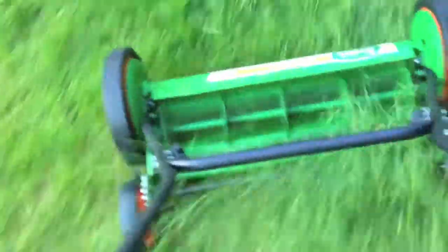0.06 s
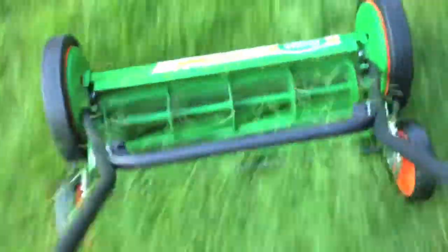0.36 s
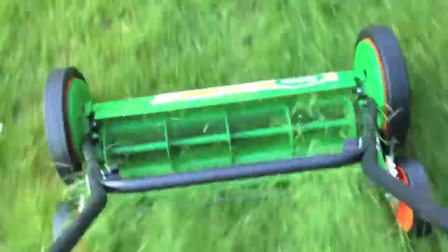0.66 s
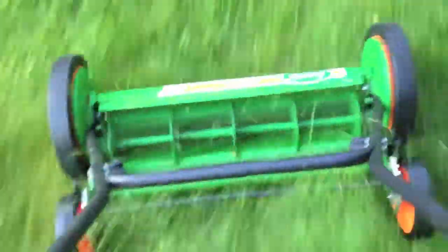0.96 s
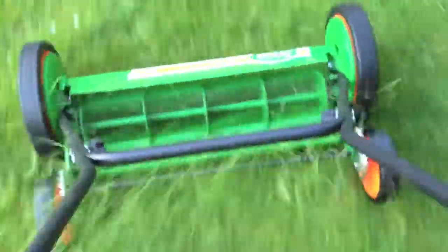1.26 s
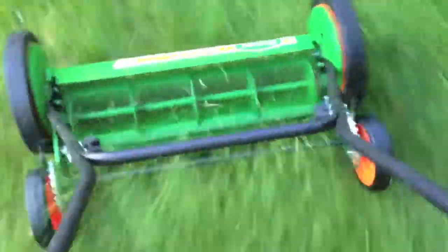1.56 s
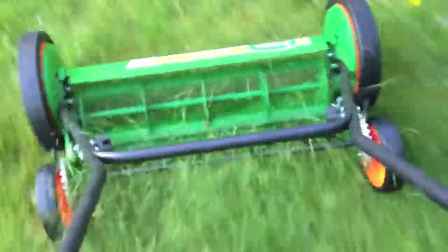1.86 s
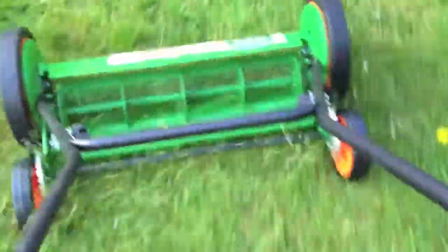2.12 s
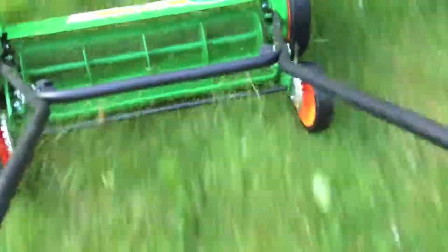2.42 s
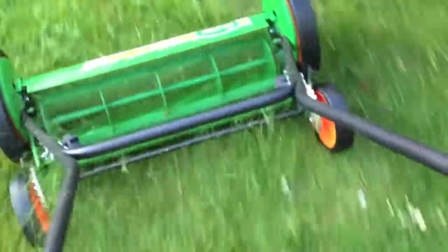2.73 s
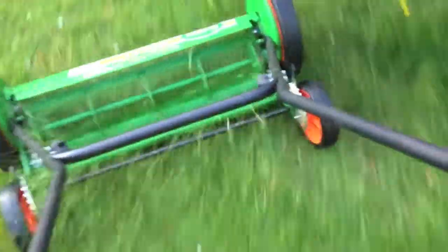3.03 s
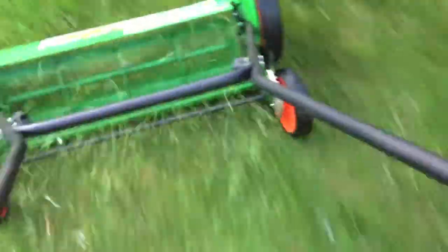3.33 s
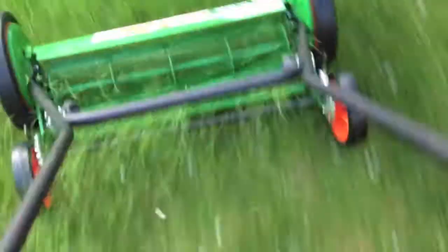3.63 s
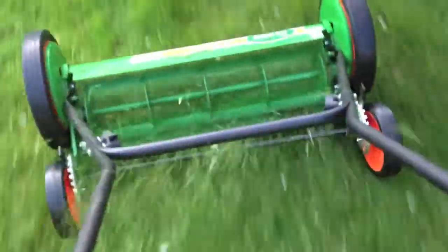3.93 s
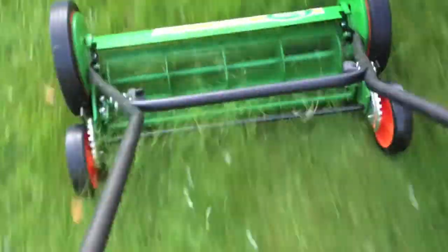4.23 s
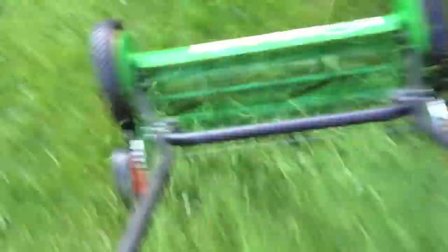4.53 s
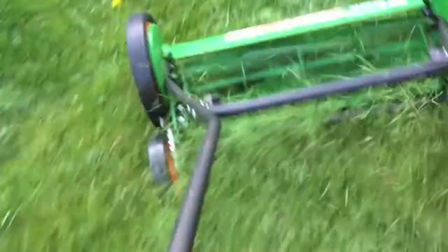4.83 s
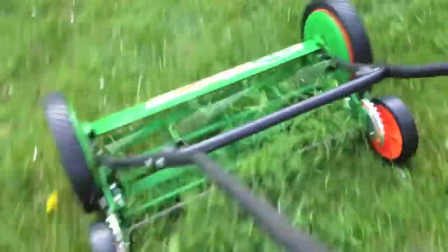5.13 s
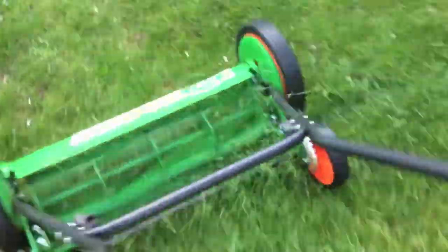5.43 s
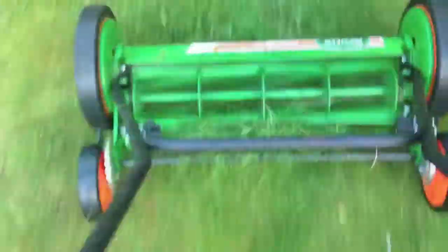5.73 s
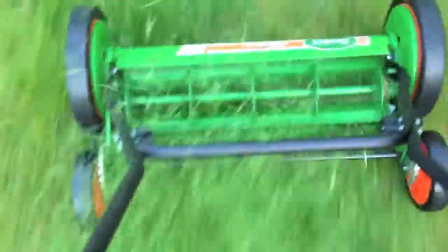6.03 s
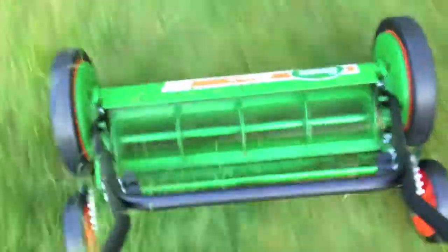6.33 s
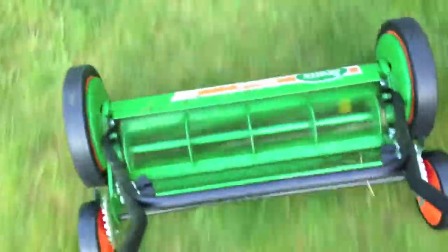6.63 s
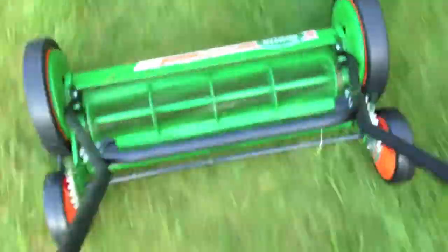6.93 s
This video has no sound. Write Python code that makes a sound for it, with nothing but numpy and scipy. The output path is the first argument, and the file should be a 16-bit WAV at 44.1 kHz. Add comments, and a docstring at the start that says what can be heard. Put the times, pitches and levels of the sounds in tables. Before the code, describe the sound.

A hand-pushed reel mower runs across a lawn, heard close from the handle with almost no outdoor background. From the start its blades make a fast, rhythmic steel-on-steel whir with faint wavering ringing and a crisp hiss of cut grass. Gears rattle in the hollow wheels, the tyres drum on the turf and the handle knocks now and then. Brighter swishes come between 1 and 2.6 seconds, with a sharp jolt at about 1.4 and two small stalk snaps just after. Blades clack around 2.4 and 3 seconds, and the wheels thump dully near 2.5 and 3.6. After a double jolt at 4.8 seconds, the mower slows to a much softer flutter for a turn. From 5.5 seconds it gathers speed again, quieter than before, with spurts of grass hiss and a few bumps until about 7 seconds.

```python
"""A whirring, rhythmic scrape of steel: a hand-pushed reel mower crossing a lawn, heard from its handle.
Five spiral blades wipe the bed knife about 44 times a second; friction rings the steel and sheared grass
hisses. Gear teeth rattle in the hollow wheels, the tyres drum on the turf and bumps knock the frame.
Near 5 s the mower slows for a turn, then gathers speed again."""
import sys
import numpy as np
from scipy import signal
from scipy.fft import rfft, irfft, next_fast_len
from scipy.io import wavfile
from scipy.ndimage import uniform_filter1d, map_coordinates

SR = 44100
rng = np.random.default_rng(int(sys.argv[2]) if len(sys.argv) > 2 else 0)


def master_out(mix):
    """Clip the mix to full scale and print it as 16-bit PCM to the path in sys.argv[1]."""
    frames = np.transpose(np.atleast_2d(mix))
    ceiling = np.clip(frames, -1, 1)
    pcm = np.round(ceiling * 32767).astype(np.int16)
    wavfile.write(sys.argv[1], SR, pcm)


N = 307377
CRUISE_HZ = 44  # blade passes a second at a steady walk

# resonances of wheels, frame and blades: (frequency [Hz], width [Hz], height above the spectrum [dB])
WHEEL_RESONANCES = [(774, 109, 8.5), (841, 49, 3.5), (952, 61, 5), (1060, 92, 6), (1250, 43, 5.5)]
FRAME_RESONANCES = [(1491, 24, 7.2), (1625, 30, 6.2), (1820, 53, 4), (1918, 180, 5)]
BLADE_RESONANCES = [(2587, 91, 3.7), (2840, 103, 1.5), (3020, 56, 0.7), (3625, 110, 2.8), (3883, 210, 2.7),
                    (4276, 180, 4.1), (4470, 65, 3.5), (4858, 110, 2.8), (4740, 76, 3), (5063, 176, 3.8),
                    (6760, 160, 4.1), (7150, 170, 1.15), (8140, 240, 3.9), (8974, 374, 3.7)]
# broad spectra of frame and blades: (frequency [Hz], relative level [dB])
FRAME_SPECTRUM = [(700, -33), (1200, -24), (1450, 2), (1900, 1), (2050, -2), (2600, -3.5), (7000, -41.5)]
BLADE_SPECTRUM = [(500, -36), (1800, -10.5), (2650, -1), (3200, -0.5), (5000, -1.5), (5500, -2.5),
                  (7500, -4), (8500, -10.5), (10000, -15.5), (15000, -17.5)]


def amp(db):
    """Amplitude ratio of a level in decibels."""
    return 10 ** (np.asarray(db) / 20)


def unit(x):
    """Normalisation to an rms of 1."""
    return x / np.sqrt(np.mean(x ** 2) + 1e-20)


def curve(rows):
    """Linear interpolation of (time [s], value) rows at every sample."""
    return np.interp(np.arange(N) / SR, *np.transpose(rows))


def swell(start, end):
    """Half-sine envelope: one rise and fall between two times."""
    return np.sin(np.pi * np.clip((np.arange(N) / SR - start) / (end - start), 0, 1))


def wobble(rate, size=8192):
    """Slow random modulation: a spline through rate Gaussian knots a second."""
    knots = N * rate / SR
    coarse = map_coordinates(rng.standard_normal(int(knots) + 4), [np.linspace(0, knots, size)])
    return np.interp(np.arange(N), np.linspace(0, N, size), coarse)


def grains(rate, spread_db):
    """Shot noise: tiny random contacts, rate a second, of log-normal size."""
    present = rng.random(N) < rate / SR
    return unit(present * np.sign(rng.standard_normal(N)) * amp(spread_db * rng.standard_normal(N)))


def burst(attack, t60):
    """Impact excitation: noise that rises quickly, under a decay of 60 dB in t60 seconds."""
    t = np.arange(SR // 3) / SR
    return rng.standard_normal(len(t)) * (1 - np.exp(-t / attack)) * amp(-60 * t / t60)


def band(x, centre_hz, q):
    """A second-order resonator of quality factor q."""
    return signal.lfilter(*signal.iirpeak(min(centre_hz, SR / 2 - 1), q, SR), x)


def body(x, spectrum, modes=(), size=16384):
    """Forced response of a body: a minimum-phase filter with resonance peaks on a broad spectrum."""
    hz = np.fft.rfftfreq(size, 1 / SR)
    knot_hz, knot_db = np.transpose(spectrum)
    db = np.interp(np.log(hz + 1), np.log(knot_hz), knot_db)
    for centre, width, height in modes:
        db = db + height / (1 + (2 * (hz - centre) / width) ** 2)
    cepstrum = irfft(np.log(amp(db)))
    cepstrum[1:size // 2] *= 2  # folding the cepstrum makes the response causal
    cepstrum[size // 2 + 1:] = 0
    return signal.fftconvolve(x, irfft(np.exp(rfft(cepstrum))))[:len(x)]


def patches(x, depth_db, size=1024):
    """Spectral fluctuation: no two contacts are alike, so narrow bands swell and fade at random."""
    spectra = signal.stft(x, nperseg=size)[2]
    field = rng.standard_normal(spectra.shape)
    field = uniform_filter1d(uniform_filter1d(field, 3, axis=0), 3, axis=1)
    return unit(signal.istft(spectra * amp(depth_db * unit(field)), nperseg=size)[1][:N])


def add(track, time, sound, peak_db):
    """Superposition: a sound joins the track at the given time and peak level."""
    part = track[max(round(time * SR), 0):][:len(sound)]
    part += (amp(peak_db) * sound / np.abs(sound).max())[:len(part)]


def pressure(passes, peak_at, depth_db, scatter_db, sharp=0):
    """Amplitude modulation: the sliding contact drives a part hardest near fraction peak_at of a pass."""
    # how hard each of the five blades meets the knife: (relative level [dB])
    contact_db = [0.37, -0.85, 0.82, 0.23, -0.36]
    cycles = passes - peak_at + 1.5
    count = cycles.astype(int)
    angle = 2 * np.pi * cycles
    bite = -np.cos(angle + sharp * (1 - np.cos(angle)))  # a sharp bite rises fast and eases off slowly
    pass_db = np.take(contact_db, count, mode="wrap") + scatter_db * rng.standard_normal(1024)[count]
    return unit(amp(depth_db * bite + pass_db * (1 + bite) / 2))


def clump_boost(cut_s=0.072):
    """Transient loading: the rise in level [dB] while coarse stalks pass through the blades."""
    # clumps of stalks: (time [s], rise of the grass hiss [dB])
    clumps = [(1.38, 2.5), (1.645, 4), (2.385, 4), (2.5, 5), (4.11, 2), (5.259, 1), (5.9, 3.5), (6.0, 5),
              (6.31, 5), (6.48, 4.5), (6.64, 2.5), (6.85, 4.5)]
    return sum(db * swell(time - cut_s / 2, time + cut_s / 2) for time, db in clumps)


def air():
    """Ambient noise: a faint, steady broadband floor."""
    # outdoor air: (frequency [Hz], relative level [dB])
    air_spectrum = [(25, -30), (200, 2), (1000, 1), (15000, -17)]
    return amp(-66) * unit(body(rng.standard_normal(N), air_spectrum))


def rolling(load_db):
    """Roughness excitation: hard tyres drum over the turf, louder under load, and thump into hollows."""
    # broad spectra of tyres and turf: (frequency [Hz], relative level [dB])
    tyre_spectrum = [(25, -66), (60, -54), (110, -17), (160, -4), (200, -1), (330, -1), (430, -2.5),
                     (650, 1.5), (900, -19), (2000, -34)]
    turf_spectrum = [(25, -33), (50, -37), (80, -17.5), (135, -0.5), (230, -3), (330, -13.5), (600, -33),
                     (1500, -56)]
    # resonances of the tyres and of the mower bouncing on them: (frequency [Hz], width [Hz], height [dB])
    tyre_modes = [(207.6, 23.5, 10.1), (281.6, 25, 6.8), (364, 32, 5.2), (492, 14.4, 8.3), (565, 105, 6.6)]
    bounce_modes = [(147, 70, 5)]
    # stretches of uneven ground: (start [s], end [s], rumble level [dB])
    uneven_ground = [(0.0, 1.6, -59), (0.452, 0.95, -51), (2.3, 3.25, -50.5), (3.55, 3.66, -41),
                     (3.88, 4.76, -49), (5.08, 5.318, -52)]
    # wheels dropping into hollows: (time [s], peak level [dB])
    thumps = [(2.35, -26.5), (2.507, -28.5), (2.683, -26.5), (2.781, -32), (2.892, -32), (3.567, -23),
              (3.604, -24), (3.946, -30), (3.985, -31), (4.123, -32), (4.522, -34)]
    drum_db = -41 + 0.95 * load_db + 1.27 * wobble(14)
    rumble_gain = amp(-69.5) + sum(amp(db) * swell(start, end) for start, end, db in uneven_ground)
    tread = patches(body(grains(rate=1200, spread_db=3), tyre_spectrum, tyre_modes), depth_db=2.5)
    ground = unit(body(grains(rate=600, spread_db=3), turf_spectrum))
    out = amp(drum_db) * tread + rumble_gain * ground
    for time, db in thumps:
        add(out, time, body(burst(attack=0.0053, t60=0.07), turf_spectrum, bounce_modes), db)
    return out


def teeth(passes, per_pass, jitter, spread_db):
    """Gear backlash: one tap a tooth, its timing scattered by a fraction jitter of the tooth period."""
    onsets = np.flatnonzero(np.diff(np.floor(passes * per_pass)))
    lateness, strength = rng.standard_normal((len(onsets), 2)).T
    onsets = np.clip(onsets + jitter * np.gradient(onsets) * lateness, 0, N - 1).astype(int)
    return unit(np.bincount(onsets, amp(spread_db * strength), N))


def gears(passes, effort_db, load_db):
    """Structure-borne sound: tooth taps and sliding grit excite the hollow wheels and the steel frame."""
    # broad spectrum of the wheels: (frequency [Hz], relative level [dB])
    wheel_spectrum = [(300, -48.5), (660, -9.5), (740, -4), (1100, 0.5), (1350, -0.5), (1700, -10.5),
                      (3000, -34.5)]
    wheel_db = -29.5 + load_db
    frame_db = -28 + 0.42 * effort_db + 0.51 * load_db + 0.63 * wobble(16)
    taps = teeth(passes, per_pass=6, jitter=0.15, spread_db=1.5)
    on_wheels = taps + 2.27 * grains(rate=4000, spread_db=3)
    on_wheels *= pressure(passes, peak_at=0.12, depth_db=0.5, scatter_db=0.5)
    on_frame = taps + 1.88 * grains(rate=5000, spread_db=1)
    on_frame *= pressure(passes, peak_at=0.43, depth_db=2.5, scatter_db=0.5)
    wheels = patches(body(on_wheels, wheel_spectrum, WHEEL_RESONANCES), depth_db=1.5)
    frame = patches(body(on_frame, FRAME_SPECTRUM, FRAME_RESONANCES), depth_db=1)
    return amp(wheel_db) * wheels + amp(frame_db) * frame


def clatter():
    """Impact and fracture: each knock, jolt, clack or snap briefly excites the resonances of its source."""
    # the handle knocking in its mounts: (time [s], peak level [dB], frequency [Hz])
    knocks = [(0.043, -23, 536), (0.395, -25, 590), (1.458, -24, 567), (2.02, -23.5, 592.5),
              (2.225, -27.5, 541.4), (2.398, -25, 610), (3.403, -24, 571), (4.259, -25, 590.6),
              (4.524, -26, 566), (4.751, -24, 523.5), (5.069, -23, 639), (5.926, -27, 616.7)]
    # bumps jolting the whole frame: (time [s], peak level [dB])
    jolts = [(.043, -15), (1.362, -9.5), (1.688, -17), (2.684, -17), (4.751, -13), (4.785, -13),
             (6.027, -19), (6.466, -15), (6.842, -19)]
    # blades catching hard on the knife: (time [s], relative peak level [dB])
    clacks = [(1.362, -6), (1.405, -8), (1.525, -11), (2.399, -5), (2.465, -6), (2.492, -8), (2.95, -12),
              (3.038, -5), (3.081, -9.5), (3.533, -14)]
    # dry stalks snapping: (time [s], peak level [dB], frequency [Hz], 60 dB decay time [s])
    snaps = [(1.468, -13, 11080, 0.041), (1.679, -10.5, 10340, 0.0096)]
    out = np.zeros(N)
    for time, db, hz in knocks:
        add(out, time, band(band(burst(attack=0.00036, t60=0.041), hz, q=6.3), hz, q=3.3), db)
    # the frame's response to a jolt: (frequency [Hz], relative level [dB])
    jolt_spectrum = [(60, -42), (200, -11), (400, -8), (650, -10), (1000, -1), (1500, 1), (2100, 1),
                     (3000, -12), (8000, -26)]
    for time, db in jolts:
        blow = burst(attack=0.00075, t60=0.052)
        add(out, time, body(blow, jolt_spectrum, WHEEL_RESONANCES + FRAME_RESONANCES), db)
    for time, db in clacks:
        blow = burst(attack=0.00135, t60=0.03)
        blade_ring = body(blow, BLADE_SPECTRUM, BLADE_RESONANCES)
        frame_ring = body(blow, FRAME_SPECTRUM, FRAME_RESONANCES)
        add(out, time, blade_ring + 0.5 * frame_ring, db - 3.5)
    for time, db, hz, t60 in snaps:
        add(out, time, band(band(burst(attack=0.0011, t60=t60), hz, q=6.6), hz, q=3.3), db)
    return out


def grass(passes, pass_hz, effort_db):
    """Shear fracture: each pass makes a spray of crisp little cuts, louder with effort and speed."""
    # hiss of shearing grass: (frequency [Hz], relative level [dB])
    hiss_spectrum = [(2000, -39), (7000, 3.5), (9700, 0), (11300, 4), (13000, 2), (14000, -2), (15400, -5)]
    hiss_db = -31.5 + 0.54 * effort_db + 0.13 * (pass_hz - CRUISE_HZ) + clump_boost() + 0.51 * wobble(25)
    cuts = grains(rate=18000, spread_db=2) * pressure(passes, peak_at=0.217, depth_db=1.56, scatter_db=0.2)
    return amp(hiss_db) * patches(body(cuts, hiss_spectrum), depth_db=3.5)


def reel(passes, pass_hz):
    """Modal ringing: blade strokes sustain the reel's own tones, louder the faster it spins."""
    # long-lived modes of the reel: (frequency [Hz], width [Hz], relative level [dB])
    reel_modes = [(1488, 2.5, -8), (1842, 24.5, -5), (4230, 36, -8), (4745, 43, -2), (4860, 46, -8),
                  (6825, 170, 0)]
    strokes = grains(rate=1500, spread_db=7.5) * pressure(passes, peak_at=0.22, depth_db=10, scatter_db=3)
    tones = sum(amp(db + 1.9 * wobble(6.2)) * unit(band(strokes, hz, q=hz / width))
                for hz, width, db in reel_modes)
    return amp(-40.5) * (pass_hz / CRUISE_HZ) ** 2 * tones


def wavering_tones(passes):
    """Amplitude and phase modulation: narrow, wavering tones swell and fade, pulsing with the blades."""
    # swelling tones: (one end of the swell [s], other end [s], frequency [Hz], nominal level [dB])
    tones = [(0.0, 3, 850, -34), (.35, 0.77, 1856, -30), (1.03, 1.32, 1487, -27), (1.0, 1.74, 1034, -32),
             (3.0, 4.3, 1478, -30), (3.25, 3.82, 1087, -31.5), (3.55, 4.25, 2315, -31),
             (3.95, 3.9, 6795, -26), (4.65, 5.35, 1069, -36), (5.05, 5.8, 1827, -35.5),
             (5.25, 5.65, 795, -36), (6.0, 6.5, 429, -45), (6.15, 6.8, 2332, -34), (6.25, 6.97, 4760, -37)]
    t = np.arange(N) / SR
    pulsing = pressure(passes, peak_at=0.33, depth_db=3, scatter_db=2.2)
    out = np.zeros(N)
    for start, end, hz, db in tones:
        envelope = amp(db + 1.6 * wobble(30)) * swell(start, end) * pulsing
        out += envelope * np.sin(2 * np.pi * hz * t + 1.28 * wobble(70))
    return out


def knife(passes, pass_hz, effort_db):
    """Resonance of the bed knife late in each pass: a rough band, and pings pitched higher at speed."""
    # broad spectrum of the knife: (frequency [Hz], relative level [dB])
    knife_spectrum = [(1200, -49), (1900, -26), (2100, 2), (2340, 1), (2450, -7.5), (3200, -24),
                      (7000, -63)]
    # its resonances: (frequency [Hz], width [Hz], height [dB])
    knife_modes = [(2025, 100, 2.7), (2160, 53, 3.6), (2317, 120, 2.7), (2430, 53, 4)]
    ring_db = -29 + 1.1 * effort_db + 1.1 * wobble(10)
    force = pressure(passes, peak_at=0.75, depth_db=3, scatter_db=0.8)
    contacts = grains(rate=3000, spread_db=5.5) * force
    rough = patches(body(contacts, knife_spectrum, knife_modes), depth_db=2.5)
    strike = pressure(passes, peak_at=0.71, depth_db=4, scatter_db=3) * amp(1.4 * wobble(35))
    ping_hz = 2235 + 100.2 * np.tanh((pass_hz - 42) / 4) + 50 * wobble(60)
    pings = unit(strike * np.sin(2 * np.pi * np.cumsum(ping_hz) / SR))
    return amp(ring_db) * unit(rough + 0.95 * pings)


def blades(passes, effort_db):
    """Sliding friction: steel scrapes on steel once a blade, with a brighter swish in thick grass."""
    # thick tufts: (start [s], end [s], swish level [dB])
    tufts = [(0, .95, -36), (1.027, 1.28, -25.5), (1.5, 1.68, -28.5), (2.1, 2.277, -27), (2.439, 2.6, -30)]
    scrape_db = -21 + effort_db + 0.42 * clump_boost()
    force = pressure(passes, peak_at=0.31, depth_db=1.4869, scatter_db=1.13, sharp=0.48)
    force *= amp(0.48 * wobble(170))
    contacts = grains(rate=14000, spread_db=1) * force
    scrape = patches(body(contacts, BLADE_SPECTRUM, BLADE_RESONANCES), depth_db=2.26)
    swish = unit(band(band(grains(rate=9000, spread_db=5) * force, 4760, q=6.4), 4530, q=4.8))
    swish_gain = sum(amp(db) * swell(start, end) for start, end, db in tufts)
    return amp(scrape_db) * scrape + swish_gain * swish


def scene():
    """Gear coupling: one speed times the gears and the cutting; effort and load shape the levels."""
    # speed of the reel: (time [s], blade-pass frequency [Hz])
    reel_speed = [(0.0, 49), (0.23, 38.7), (0.63, 40.1), (0.98, 39), (1.11, 51), (1.29, 43.1), (1.68, 43.3),
                  (1.76, 33.5), (2.25, 43.1), (3.72, 45.4), (3.8, 42), (4.1, 47), (4.2, 42.8), (4.66, 38.6),
                  (5.03, 19.8), (5.49, 24.5), (5.6, 32.8), (5.83, 38.6), (6.97, 51)]
    # how hard the blades work: (time [s], level relative to a steady cut [dB])
    effort = [(0.0, 0), (0.4, -2.5), (0.52, -0.5), (0.92, -2.6), (1.1, 1.8), (1.45, -0.5), (1.63, 1.2),
              (1.76, -3.8), (2.2, -0.9), (3.1, 0), (4.1, 0.5), (4.4, -2), (4.77, -3.3), (4.97, -10.5),
              (5.04, -15.5), (5.11, -9), (5.31, -9), (5.41, -12.5), (5.58, -8), (6.14, -9.5), (6.3, -7.5),
              (6.97, -6)]
    # weight on the wheels, lightest coming out of the turn: (time [s], relative level [dB])
    wheel_load = [(0.0, 2.5), (0.3, 0.8), (1.0, -0.5), (1.65, 0.5), (1.95, -1.5), (2.4, -0.2), (3.6, 0),
                  (4.55, 0), (4.8, 0.5), (5.2, -2.5), (5.48, -1.5), (5.68, -7), (5.95, -1.5), (6.65, -3.5),
                  (6.85, -1.5), (6.97, -6)]
    pass_hz = curve(reel_speed)
    passes = np.cumsum(pass_hz) / SR  # running count of blade passes
    effort_db = curve(effort) + 0.66 * wobble(18)  # the lawn is never quite even
    load_db = curve(wheel_load) + 0.41 * wobble(14)
    mono = air() + blades(passes, effort_db) + knife(passes, pass_hz, effort_db)
    mono += reel(passes, pass_hz) + wavering_tones(passes) + grass(passes, pass_hz, effort_db)
    mono += gears(passes, effort_db, load_db) + rolling(load_db) + clatter()
    return np.array([mono, mono])


def record(dry):
    """Band limiting: a small microphone sheds the deep bass, and the highest treble is cut off."""
    low_hz, top_hz = 55, 15400
    thin = signal.sosfilt(signal.butter(2, low_hz, "highpass", fs=SR, output="sos"), dry)
    size = next_fast_len(N + SR // 2)
    passband = np.fft.rfftfreq(size, 1 / SR) < top_hz
    return irfft(rfft(thin, size) * passband, size)[:, :N]


dry = scene()
out = record(dry)
master_out(out)
```